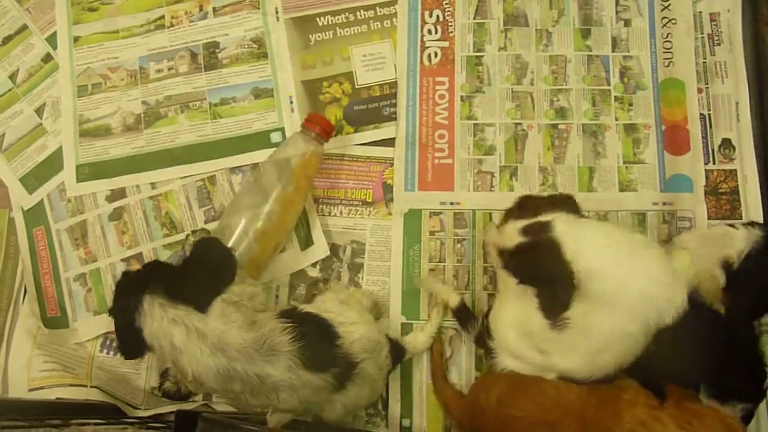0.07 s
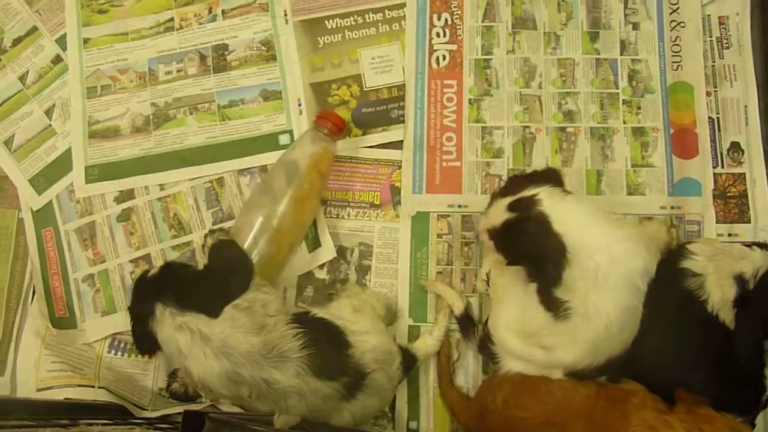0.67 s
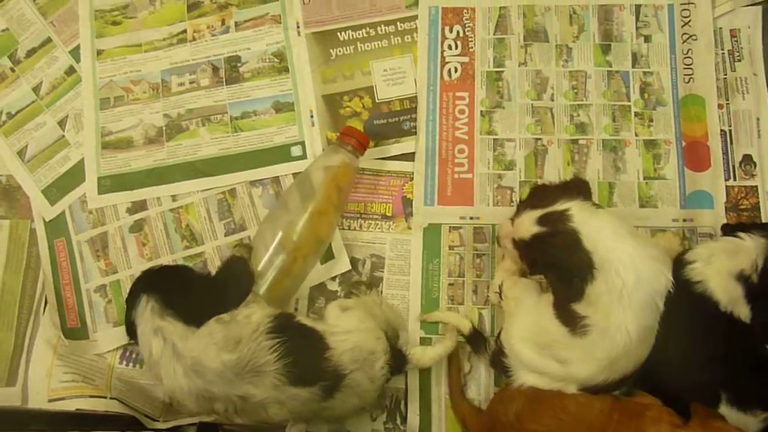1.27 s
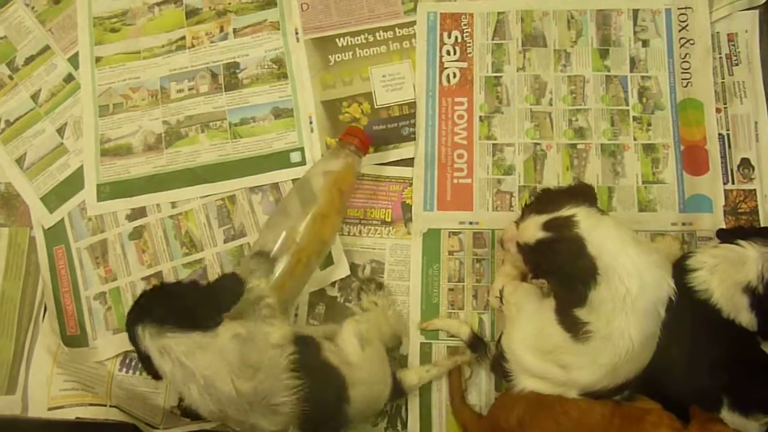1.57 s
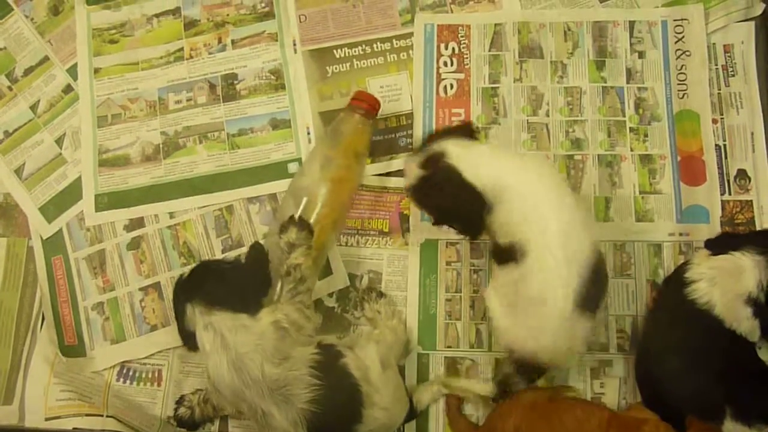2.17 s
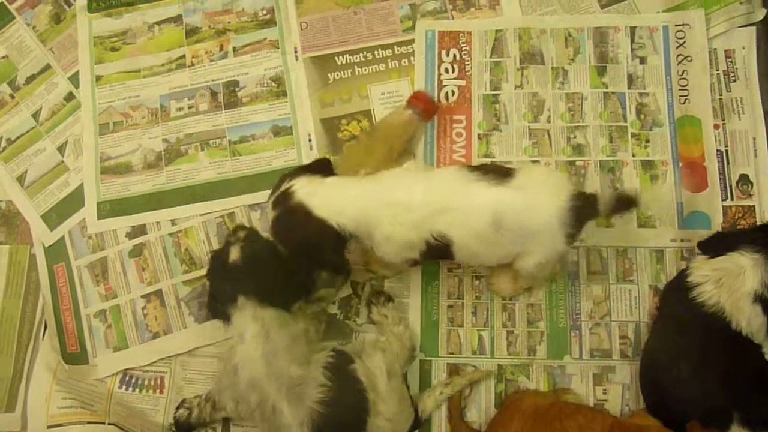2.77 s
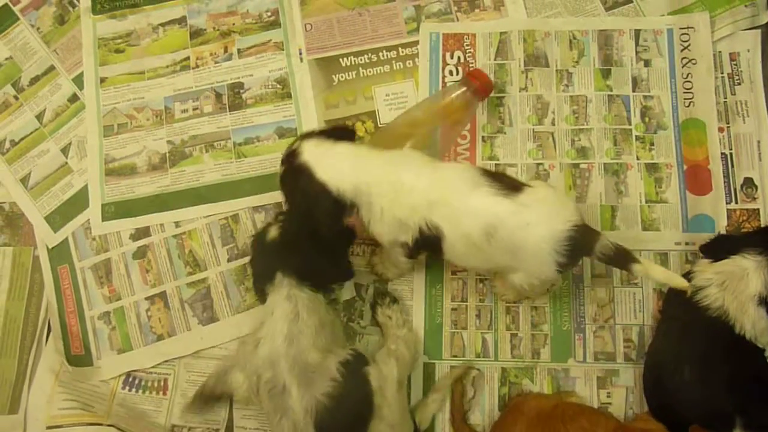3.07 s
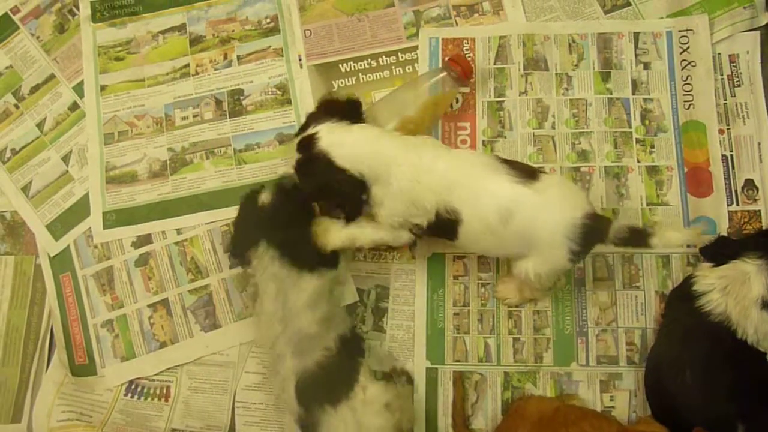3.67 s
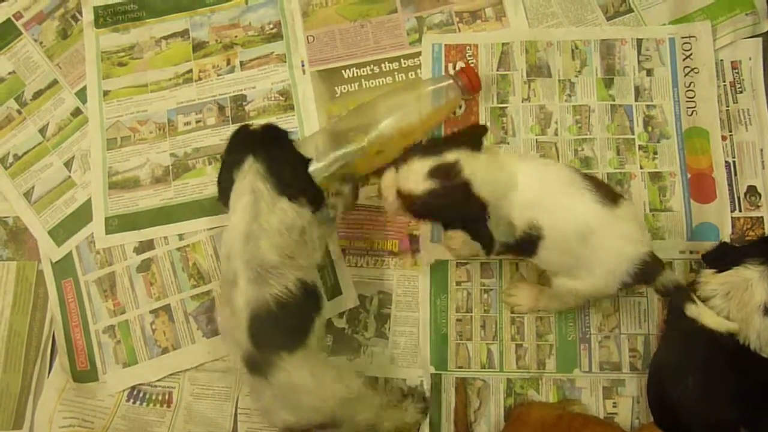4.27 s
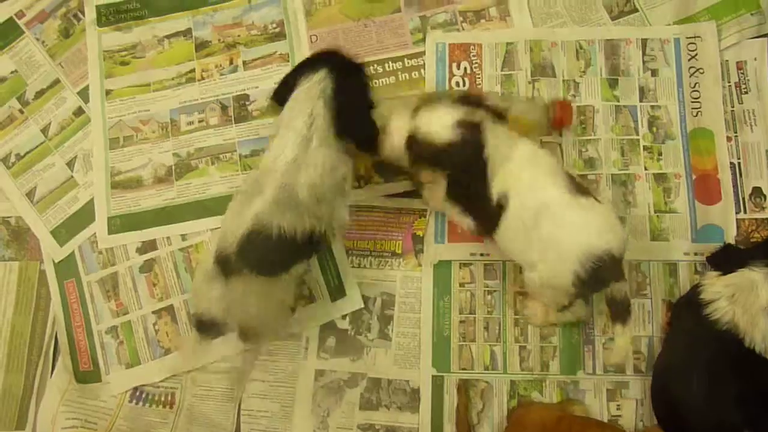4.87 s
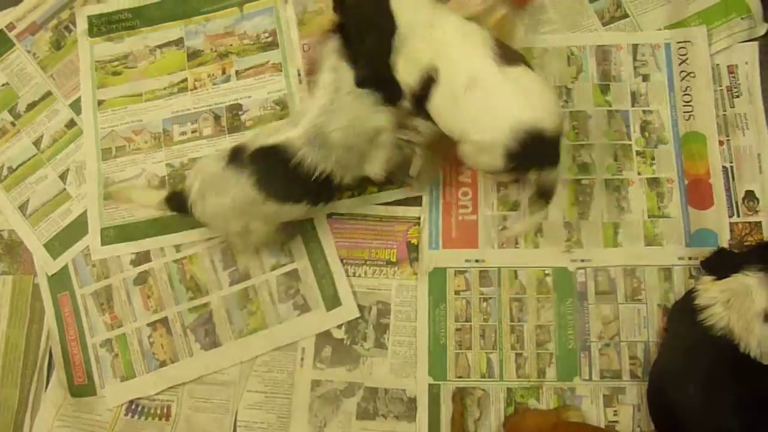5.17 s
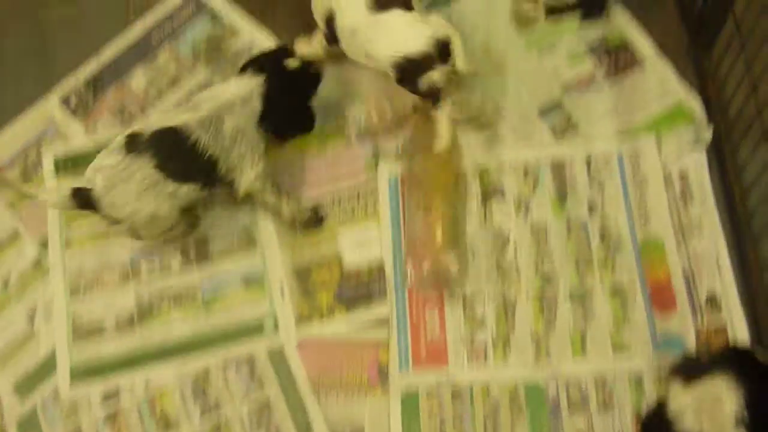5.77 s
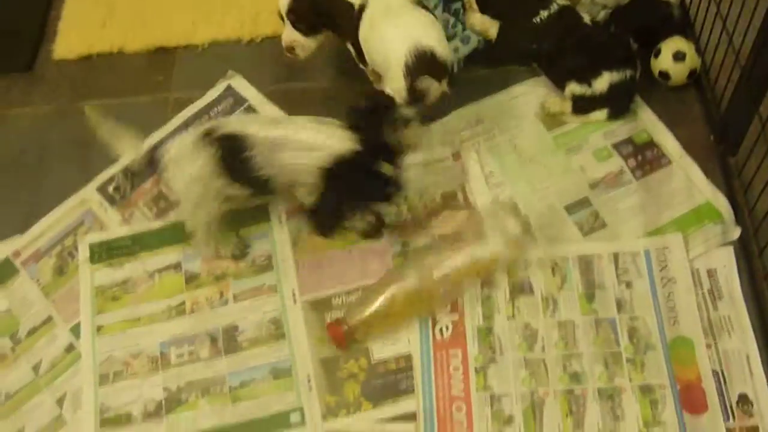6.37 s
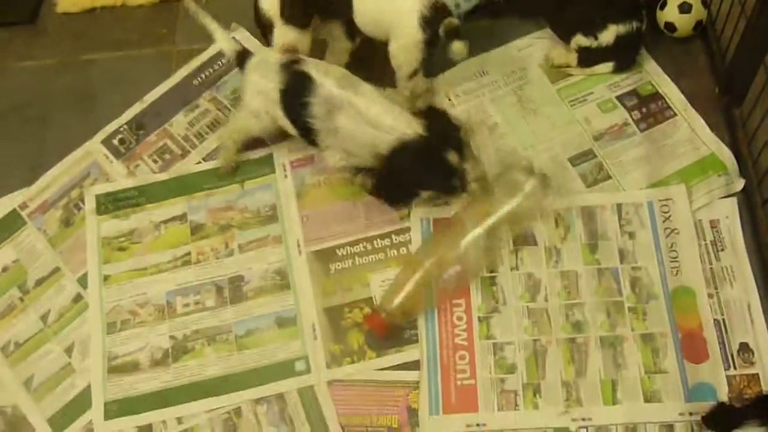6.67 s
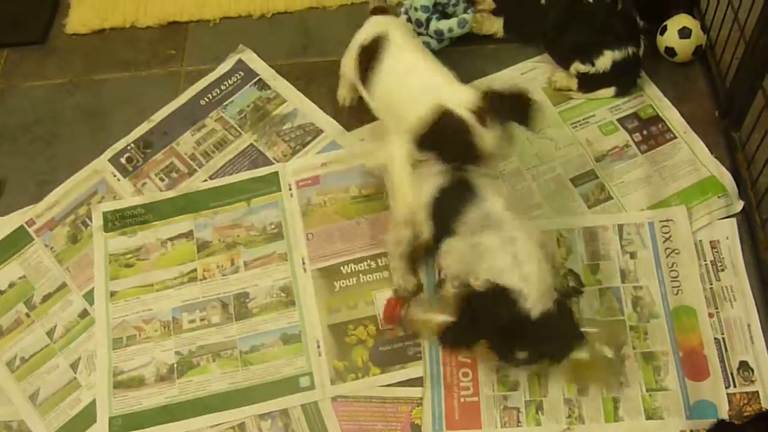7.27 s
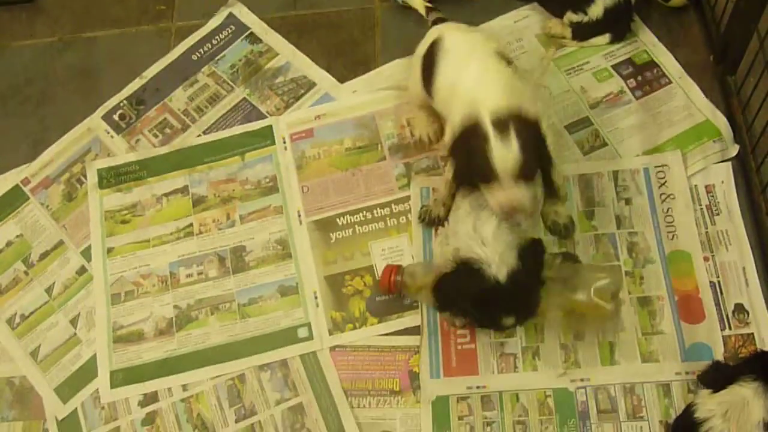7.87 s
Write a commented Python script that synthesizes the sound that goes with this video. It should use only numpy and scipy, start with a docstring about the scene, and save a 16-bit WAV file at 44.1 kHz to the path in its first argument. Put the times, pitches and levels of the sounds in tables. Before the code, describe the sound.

In a small, hard-walled room with a faint hum, newspaper rustles and slides under the dull thuds of puppy paws. The rustling grows, and something rubbed hard gives raspy squeaks. A much louder scuffle follows: a plastic bottle scrapes and knocks with a hollow ring while paper and plastic snap. It ends with a short swish and a few light taps, heard through a small microphone with little top end.

```python
"""Puppies scuffling over a plastic bottle

Paws pad, knock and slide on a newspaper-covered floor in a small, hard room. The sheets rub in
tiny slips, crinkle and snap, and something rubbed hard squeaks by stick-slip. Then the bottle is
shoved about, its wall and air ringing hollowly, and a last skid swishes over the paper."""
import sys
import numpy as np
from scipy import signal
from scipy.fft import rfft, irfft, next_fast_len
from scipy.io import wavfile

SR = 44100
rng = np.random.default_rng(int(sys.argv[2]) if len(sys.argv) > 2 else 0)


def wav_record(signal):
    """Record a signal, one row per channel, as 16-bit PCM in the file named by sys.argv[1]."""
    frames = np.transpose(np.atleast_2d(signal))
    bounded = np.clip(frames, -1, 1)
    # unit amplitude maps onto the largest positive 16-bit level
    quanta = np.round(bounded * 32767).astype(np.int16)
    wavfile.write(sys.argv[1], SR, quanta)


N = 358533
TIME = np.arange(N) / SR


def amp(db):
    """Decibels to gain."""
    return 10 ** (np.asarray(db) / 20)


def unit(x):
    """Scales to rms 1."""
    return x / np.sqrt(np.mean(x ** 2) + 1e-20)


def unit_hit(x):
    """Scales a hit to the energy of 5 ms at rms 1."""
    return x * np.sqrt(.005 * SR / np.sum(x ** 2))


def at_hz(points, hz):
    """Interpolates (freq_hz, value) rows on a log-frequency axis."""
    freq_hz, value = np.transpose(points)
    return np.interp(np.log(hz + 1), np.log(freq_hz + 1), value)


def add(mix, start_s, sound):
    """Mixes a sound in at start_s."""
    part = mix[max(round(start_s * SR), 0):][:len(sound)]
    part += sound[:len(part)]


def coloured(x, spectrum):
    """Minimum-phase filter: clicks keep their sharp front."""
    hz = abs(np.fft.fftfreq(4096, 1 / SR))
    log_gain = np.log(amp(at_hz(spectrum, hz)))
    taps = np.fft.ifft(np.exp(np.conj(signal.hilbert(log_gain)))).real
    return signal.oaconvolve(x, taps[:len(taps) // 2])[:len(x)]


def wander(rate_hz):
    """Smooth random motion of rms 1, up to about rate_hz."""
    size = next_fast_len(N)
    hz = np.fft.rfftfreq(size, 1 / SR)
    spectrum = rfft(rng.standard_normal(size)) * np.exp(-(hz / rate_hz) ** 2)
    return unit(irfft(spectrum)[:N])


def grains(per_s, spread_db):
    """Random impulses; a positive spread makes a few larger, a negative one a few smaller."""
    size = amp(spread_db * np.minimum(rng.exponential(1, N), 4))
    return unit(size * rng.choice([-1, 1], N) * (rng.random(N) < per_s / SR))


def slips(jerky_db=1.5):
    """Friction as a jerky stream of tiny slips."""
    return grains(per_s=2600, spread_db=3.5) * amp(jerky_db * wander(rate_hz=60))


def push(length_s, attack_s, sag_db_per_s, release_db_per_s):
    """Gain of one push: takes hold, eases off, lets go."""
    t = TIME[:SR]
    fall_db = sag_db_per_s * np.minimum(t, length_s) + release_db_per_s * np.maximum(t - length_s, 0)
    return np.minimum(t / attack_s, 1) * amp(-fall_db)


def rattle(t60_s):
    """Decaying chatter of a contact."""
    t = TIME[:SR // 5]
    return rng.standard_normal(len(t)) * amp(-60 * t / t60_s)


def blow(centre_hz, t60_s, skirt_db_per_oct, chatter):
    """One pulse plus chatter through a broad spectral hump."""
    force = chatter * rattle(t60_s)
    force[0] += 1
    octaves = np.linspace(-5, 5, 21)
    hump = [(centre_hz * 2 ** k, skirt_db_per_oct * (1 - np.hypot(k, 1))) for k in octaves]
    return unit_hit(coloured(force, hump))


# room air spectrum: freq_hz, gain_db
AIR_SPECTRUM = [(18, -62.5), (30, -12.5), (101, 3), (145, -6.5), (190, -10), (234, -4.5), (369, 4),
                (496, -12.5), (638, 2.5), (1100, -1), (3370, -8.5), (5450, -13.5), (7000, -29.5),
                (9100, -69), (15400, -120)]
# hum partials: pitch_hz, rms_db
HUM_PARTIALS = [(50, -69), (152, -56.5), (240, -52.5), (380, -57)]
def background(air_db=-47, waver_rad=0.89):
    """Room air and a wavering hum."""
    hum = np.zeros(N)
    for pitch_hz, rms_db in HUM_PARTIALS:
        phase = 2 * np.pi * pitch_hz * TIME + waver_rad * wander(rate_hz=7.5)
        hum += amp(rms_db) * np.sqrt(2) * np.sin(phase)
    return hum + amp(air_db) * unit(coloured(rng.standard_normal(N), AIR_SPECTRUM))


# weight shifting on the floor: time_s, level_db
WEIGHT_LEVELS = [(0.0, -40), (3.4, -38.5), (4.0, -40), (7.38, -41), (7.55, -51), (7.73, -40.5),
                 (8.13, -52.5)]
def shifting_weight():
    """Gain of paws and bodies bearing on the floor."""
    return amp(np.interp(TIME, *np.transpose(WEIGHT_LEVELS)))


# padding spectrum: freq_hz, gain_db
PAD_SPECTRUM = [(40, -35.5), (120, -14.5), (210, 3), (400, 3), (650, 1.5), (1000, -9.5), (2000, -24)]
def padding(weight, lumpy_db=3.5):
    """Soft, dull thuds of paws and bodies on the papered floor."""
    thuds = grains(per_s=2300, spread_db=1.0) * amp(lumpy_db * wander(rate_hz=14))
    return weight * unit(coloured(thuds, PAD_SPECTRUM))


# paper friction spectrum: freq_hz, gain_db
SLIDE_SPECTRUM = [(60, -57), (200, -21), (400, -5), (700, -7.5), (1050, 0.5), (1700, -3), (2500, -5.5),
                  (3500, -11.5), (6000, -30)]
def sliding(rub_power):
    """Paws and bottle drag the sheets over each other."""
    return np.sqrt(rub_power) * unit(coloured(slips(), SLIDE_SPECTRUM))


# paper buckling spectrum: freq_hz, gain_db
CRINKLE_SPECTRUM = [(700, -29.5), (1800, -7.5), (2800, 0), (3800, -0.5), (5000, -6.5), (6200, -13),
                    (7500, -1.5)]
def crinkling(crease_power, gain_db=10.5, clump_db=2.5):
    """Clumps of tiny bright buckles in the sheets."""
    buckles = grains(per_s=2400, spread_db=2.5) * amp(clump_db * wander(rate_hz=20))
    return np.sqrt(crease_power) * amp(gain_db) * unit(coloured(buckles, CRINKLE_SPECTRUM))


# blows on the floor: start_s, relative_db, centre_hz, t60_s
FLOOR_KNOCKS = [(0.094, -27, 235, 0.38), (0.594, -30.5, 544, 0.12), (1.341, -26, 500, 0.061),
                (1.356, -19.5, 443, 0.11), (1.521, -19, 744, 0.0062), (1.53, -25, 1030, 0.1),
                (1.813, -20.5, 550, 0.069), (1.934, -21, 610, 0.23), (2.150, -28, 280, 0.2),
                (2.51, -30.5, 220, 0.23), (2.97, -26.5, 303, .12), (3.325, -27.5, 226, 0.2),
                (3.700, -26, 495, 0.15), (3.896, -23.5, 544, 0.11), (4.173, -23, 600, 0.098),
                (4.957, -18.5, 656, 0.016), (5.03, -19, 380, 0.2), (5.106, -20.5, 300, .13),
                (5.135, -14.5, 816, 0.18), (5.576, -24.5, 380, 0.12), (6.250, -29, 323, 0.2),
                (6.949, -21, 450, 0.078), (7.062, -17, 456, 0.039), (7.176, -13.5, 1300, .041),
                (7.435, -29, 116, 0.24), (7.751, -28, 350, 0.066), (7.792, -30, 1200, .051)]
def knocks(gain_db=1):
    """Paws and bottle strike the papered floor; long blows end in a scuff."""
    out = np.zeros(N)
    for start_s, relative_db, centre_hz, t60_s in FLOOR_KNOCKS:
        knock = blow(centre_hz, t60_s, skirt_db_per_oct=18, chatter=0.24)
        add(out, start_s, amp(relative_db + gain_db) * knock)
    return out


# paw drags: start_s, length_s, rub_db, crease_relative_db
PAW_DRAGS = [ (0.265, 0.02, -32.5, -43.5), (0.398, 0.1, -50, -45.5), (0.776, 0.044, -38.5, -49),
             (1.14, 0.05, -41.5, -59), (1.373, .08, -58, -49), (1.517, .04, -37.5, -46),
             (1.69, 0.31, -43.5, -41.5), (1.924, 0.026, -30.5, -49), (2.035, 0.044, -37.5, -48),
             (2.13, 0.043, -38, -63), (2.3, 0.069, -42, -50.5), (2.49, 0.81, -43.5, -40.5),
             (2.769, 0.062, -36.5, -43), (2.88, 0.059, -26.5, -39), (2.956, 0.084, -31.5, -41.5),
             (3.161, 0.031, -42, -35), (3.269, 0.018, -36.5, -36), (3.327, 0.051, -51, -50.5),
             (3.507, 0.014, -39, -43), (3.577, 0.067, -27, -39.5), (3.661, 0.073, -27.5, -36.5),
             (3.884, 0.024, -26, -52), (4.022, 0.044, -37.5, -38), (4.17, 0.1, -38, -39.5),
             (4.336, .42, -31.5, -36), (6.395, 0.035, -40.5, -35.5)]
def paw_drags(weight, idle_rub_db=-8.5, idle_crease_db=-14.5):
    """Rub and crease power under the paws; shifting weight keeps both going faintly."""
    rub = (weight * amp(idle_rub_db)) ** 2
    crease = (weight * amp(idle_crease_db)) ** 2
    for start_s, length_s, rub_db, crease_relative_db in PAW_DRAGS:
        power = push(length_s, attack_s=0.011, sag_db_per_s=19, release_db_per_s=264) ** 2
        add(rub, start_s, power * amp(rub_db) ** 2)
        add(crease, start_s, power * amp(crease_relative_db) ** 2)
    return rub, crease


# paper and plastic snaps: start_s, relative_db, centre_hz
CREASE_SNAPS = [(1.505, -35, 4000), (1.522, -30.5, 4000), (1.765, -28, 3900), (2.501, -36, 3970),
                (3.235, -27, 4600), (3.584, -28, 1960), (3.671, -25.5, 2000), (4.03, -28.5, 3170),
                (4.958, -17.5, 2480), (4.981, -22, 2640), (5.027, -19, 2470), (5.136, -23, 2200),
                (5.387, -19.5, 2540), (5.429, -25, 2400), (5.553, -18.5, 2620), (5.594, -20, 3260),
                (5.628, -18.5, 2900), (5.716, -20, 2320), (5.775, -17.5, 1990), (5.972, -22, 2120),
                (6.354, -41, 3800), (6.402, -30.5, 3500), (6.426, -24.5, 3840), (6.566, -19, 1800),
                (7.17, -16, 1950), (7.178, -23, 2040), (7.791, -31, 2230), (7.868, -35, 3800)]
def snaps(gain_db=1):
    """Creases and dents give way in a few milliseconds."""
    out = np.zeros(N)
    for start_s, relative_db, centre_hz in CREASE_SNAPS:
        snap = blow(centre_hz, t60_s=0.02, skirt_db_per_oct=17, chatter=0.74)
        add(out, start_s, amp(relative_db + gain_db) * snap)
    return out


# squeak spectrum: freq_hz, gain_db
SQUEAK_SPECTRUM = [(1400, -11.5), (2800, -4), (4000, -3.5), (5700, -12.5), (6000, -14.5)]
# one track per squeak: time_s, pitch_hz, relative_db, roughness
SQUEAK_TRACKS = [
    [(3.274, 3094, -25.5, 0.36), (3.295, 3100, -36, 0.7)],
    [(4.308, 1640, -34.5, 0.42), (4.375, 1374, -29, 0.52), (4.415, 1430, -23, 0.6), (4.45, 1550, -30, 1)],
    [(4.43, 1803, -33, 0.85), (4.455, 1729, -27.5, 1.05), (4.545, 1535, -32, 0.67)],
    [(4.53, 2110, -29, 0.77), (4.58, 2385, -27.5, 0.96), (4.62, 2520, -29, 0.53), (4.68, 2440, -29, 0.42),
     (4.73, 2142, -26.5, 1.03), (4.765, 2610, -21, 1.11), (4.79, 2710, -20.5, 0.42),
     (4.825, 2814, -28, 0.15), (4.92, 2796, -36, 0)],
    [(4.69, 3200, -37, 0.26), (4.725, 3190, -26.5, 0.54), (4.775, 2840, -47, 0.4), (4.81, 2760, -22, 0)],
]
def squeaks(gain_db=-1, jitter=0.0733, flutter_db=4, overtone_db=-3, rasp=0.36, split=0.1):
    """Stick-slip pitch follows rubbing speed; uneven grip makes it hoarse and splits the tone."""
    out = np.zeros(N)
    for detune, strength in [(0, 1), (split, .5), (-split, .5)]:  # main contact, two side contacts
        speed, grip, grit = wander(rate_hz=153.8), wander(rate_hz=260), wander(rate_hz=1300)
        for track in SQUEAK_TRACKS:
            time_s, *columns = np.transpose(track)
            on = (TIME > time_s[0]) & (TIME < time_s[-1])
            pitch_hz, relative_db, roughness = (np.interp(TIME[on], time_s, c) for c in columns)
            bend = 1 + roughness * (detune + jitter * speed[on])
            phase = 2 * np.pi * np.cumsum(pitch_hz * bend) / SR
            tone = 0
            for k in range(1, 5):
                harmonic_db = at_hz(SQUEAK_SPECTRUM, k * pitch_hz) + overtone_db * (k - 1)
                tone += amp(harmonic_db) * np.sin(k * phase)
            hoarse = tone * amp(flutter_db * grip[on]) * (1 + rasp * roughness * grit[on])
            fade = signal.windows.tukey(on.sum(), .1)
            out[on] += strength * amp(relative_db + gain_db) * unit(hoarse) * fade
    return out


# bottle shoves: start_s, length_s, friction_db, crease_relative_db, bottle_share
BOTTLE_SHOVES = [ (4.946, .11, -18.5, -33, 0.4), (5.071, 0.093, -17.5, -28.5, 0.24),
                 (5.196, 0.072, -21.5, -28, 0.07), (5.313, 0.17, -25.5, -42.5, 0.73),
                 (5.51, 0.11, -28.5, -37, 0.5), (5.591, 0.052, -18, -25.5, 0.3),
                 (5.671, 0.067, -18, -31.5, 0.6), (5.77, 0.049, -19.5, -31, .75),
                 (5.854, .09, -22, -37, 0.83), (5.966, 0.13, -21, -29.5, 0.68),
                 (6.135, 0.064, -32.5, -43.5, 0.5), (6.513, 0.16, -27.5, -39.5, 0.55),
                 (6.54, .065, -19.5, -46, 0.89), (6.672, .15, -23.5, -38, 0.79),
                 (6.865, 0.11, -36.5, -45, 0.7), (6.949, 0.062, -21.5, -39, 0.6),
                 (7.035, 0.13, -20.5, -29.5, 0.4), (7.17, 0.2, -22, -35.5, 0.53),
                 (7.407, 0.067, -21.5, -34, 0.6), (7.705, 0.019, -34, -58, 0.9),
                 (7.786, 0.028, -32, -52, 0.96), (7.938, .025, -37, -47.5, 1)]
def bottle_shoves():
    """Rub, crease and scrape power of the shoved bottle; paper and bottle share the friction."""
    rub, crease, scrape = np.zeros((3, N))
    for start_s, length_s, friction_db, crease_relative_db, bottle_share in BOTTLE_SHOVES:
        power = push(length_s, attack_s=0.012, sag_db_per_s=19.5, release_db_per_s=237.5) ** 2
        friction = power * amp(friction_db) ** 2
        add(rub, start_s, friction * (1 - bottle_share))
        add(scrape, start_s, friction * bottle_share)
        add(crease, start_s, power * amp(crease_relative_db) ** 2)
    return rub, crease, scrape


# bottle resonances: pitch_hz, width_hz, peak_db
HOLLOW_MODES = [(960, 11, -19.5), (982, 27, -3.5), (1021, 29, -8), (1038, 12.3, 6), (1194, 9.3, 2),
                (1268, 10, 3), (1355, 45, -4), (1490, 83, -2.5), (1582, 32, 0), (2173, 81, -8.5),
                (2570, 130, -18)]
def bottle(drive):
    """The bottle's wall and air ring in narrow modes."""
    t = TIME[:SR // 5]
    ring = np.zeros(len(t))
    for pitch_hz, width_hz, peak_db in HOLLOW_MODES:
        decay = np.exp(-np.pi * width_hz * t)
        ring += amp(peak_db) * width_hz * decay * np.cos(2 * np.pi * pitch_hz * t)
    return signal.oaconvolve(drive, ring)[:len(drive)]


def scraping(scrape_power):
    """Friction rings the bottle as it is pushed along."""
    return np.sqrt(scrape_power) * unit(bottle(slips()))


# bottle bumps: start_s, level_db
BOTTLE_BUMPS = [(4.962, -21.5), (5.041, -12.5), (5.688, -30), (5.801, -23.5), (5.99, -18), (6.561, -18),
                (6.699, -19), (7.076, -12.5), (7.178, -24), (7.439, -23), (7.799, -25.5)]
def bumps(t60_s=0.062):
    """Each bump sets the tumbling bottle ringing."""
    out = np.zeros(N)
    for start_s, level_db in BOTTLE_BUMPS:
        add(out, start_s, amp(level_db) * unit_hit(bottle(rattle(t60_s))))
    return out


# skid spectrum: freq_hz, gain_db
SKID_SPECTRUM = [(500, -43), (1800, -10), (2500, -3.5), (3000, 2), (4000, -1.5), (4800, 0.5), (5900, -0.5),
                 (6500, -4.5), (7200, -11)]
def skid(start_s=7.479, level_db=-14):
    """Fast sliding fuses the slips into a bright swish that fades as it slows."""
    speed = np.zeros(N)
    add(speed, start_s, push(length_s=0.13, attack_s=0.014, sag_db_per_s=104, release_db_per_s=228))
    swish = unit(coloured(grains(per_s=2300, spread_db=-3.5), SKID_SPECTRUM))
    return speed * amp(level_db) * swish


# reverberation: freq_hz, t60_s
ROOM_DECAY = [(100, 0.37), (400, 0.42), (1200, 0.52), (3000, 0.53), (7000, 0.45)]
def room(x, wet_db, gap_s=.005, echoes_per_s=3000):
    """Close walls return dense reflections that die band by band."""
    t = TIME[:SR // 2]
    signs = rng.choice([-1., 1.], len(t))
    arrivals = (rng.random(len(t)) < echoes_per_s / SR) & (t > gap_s)
    hz, age_s, bands = signal.stft(signs * arrivals, SR, nperseg=256)
    decay = amp(-60 * age_s / at_hz(ROOM_DECAY, hz)[:, None])
    _, tail = signal.istft(bands * decay, SR, nperseg=256)
    echo = signal.oaconvolve(x, tail / np.linalg.norm(tail))[:N]
    return (x + amp(wet_db) * echo) / np.hypot(1, amp(wet_db))


def scene():
    """The scuffle in its room; the bottle's hollow ring is a little drier than the rest."""
    weight = shifting_weight()
    paw_rub, paw_crease = paw_drags(weight)
    shove_rub, shove_crease, scrape = bottle_shoves()
    scuffle = padding(weight) + sliding(paw_rub + shove_rub) + crinkling(paw_crease + shove_crease)
    scuffle += snaps() + knocks() + squeaks() + skid()
    hollow = scraping(scrape) + bumps()
    return (room(scuffle, wet_db=-5) + room(hollow, wet_db=-6.5) + background())[None]


# microphone response: freq_hz, gain_db
MIC_RESPONSE = [(20, -15.5), (50, 1.5), (6000, -3), (6600, -9.5), (7200, -22.5), (7700, -43)]
def record(dry, cutoff_hz=7750):
    """A small narrow-band microphone."""
    low_pass = signal.firwin(511, cutoff_hz, window=("kaiser", 9), fs=SR)
    return signal.oaconvolve(coloured(dry[0], MIC_RESPONSE), low_pass, "same")[None]


dry = scene()
out = record(dry)
wav_record(out)
```